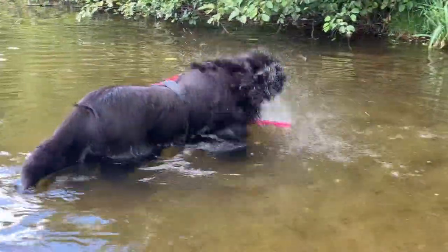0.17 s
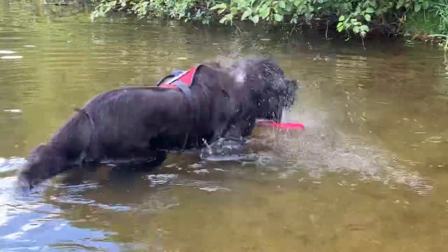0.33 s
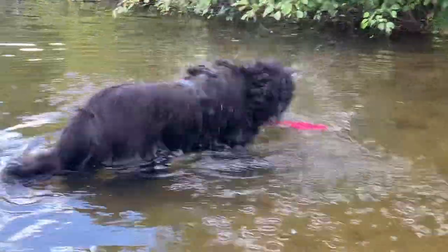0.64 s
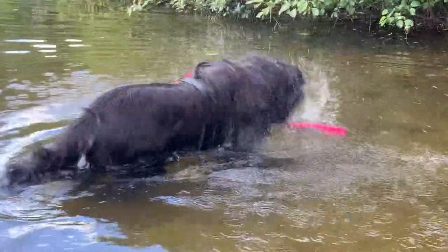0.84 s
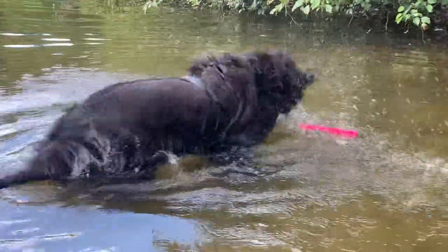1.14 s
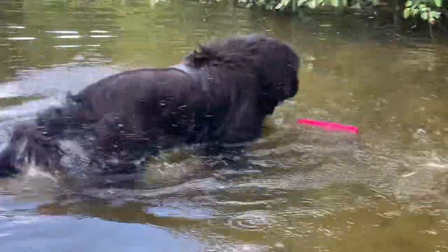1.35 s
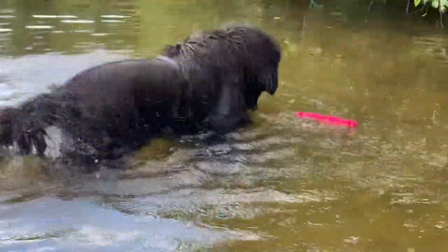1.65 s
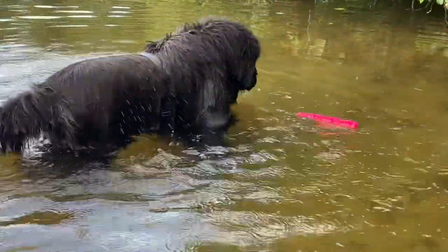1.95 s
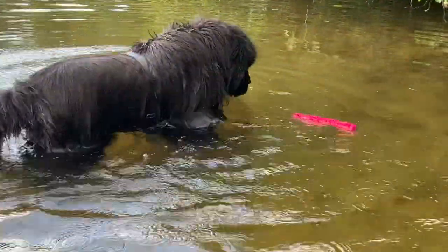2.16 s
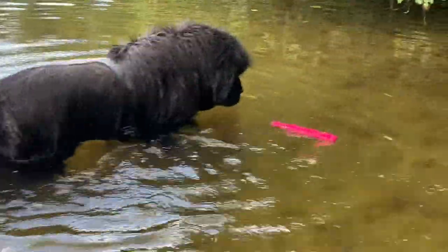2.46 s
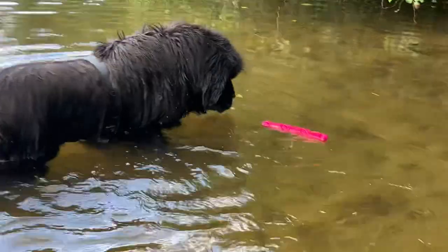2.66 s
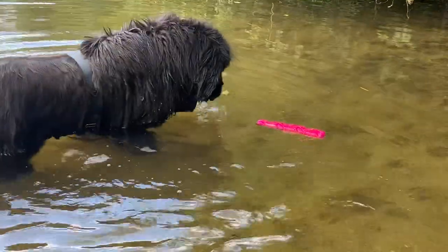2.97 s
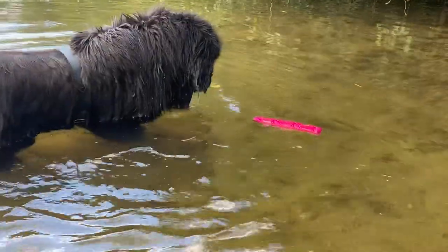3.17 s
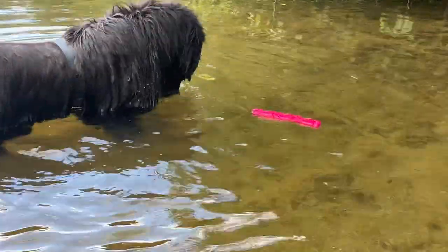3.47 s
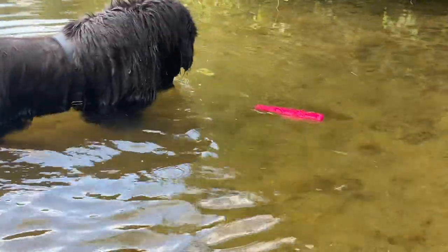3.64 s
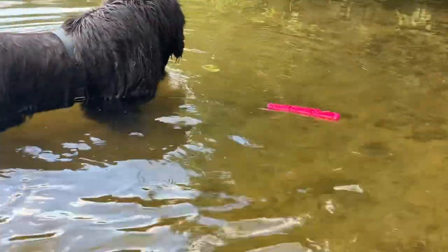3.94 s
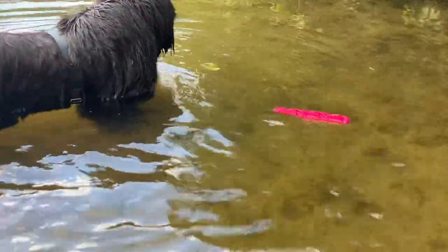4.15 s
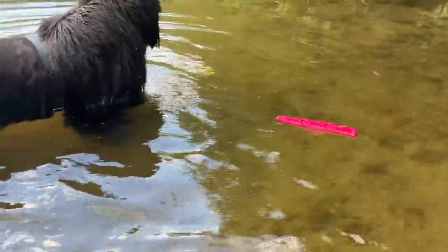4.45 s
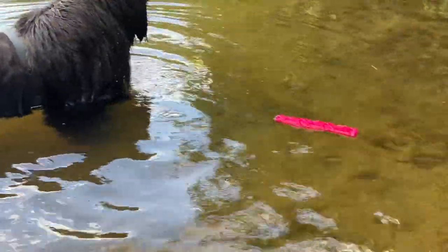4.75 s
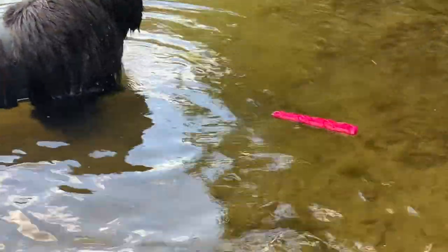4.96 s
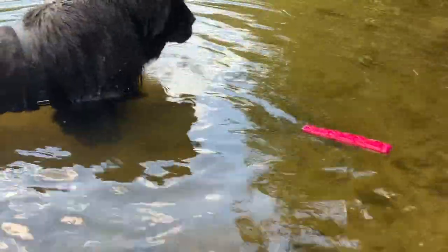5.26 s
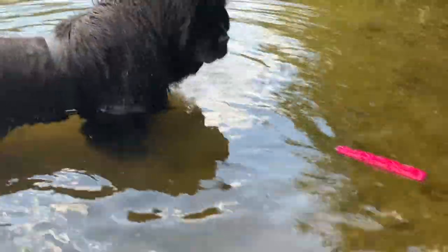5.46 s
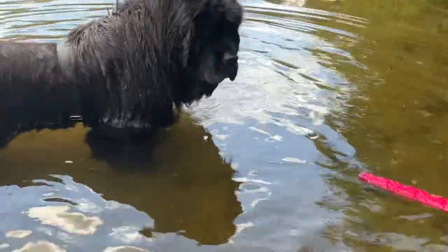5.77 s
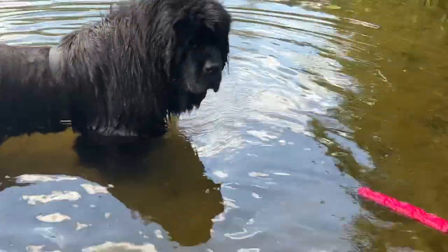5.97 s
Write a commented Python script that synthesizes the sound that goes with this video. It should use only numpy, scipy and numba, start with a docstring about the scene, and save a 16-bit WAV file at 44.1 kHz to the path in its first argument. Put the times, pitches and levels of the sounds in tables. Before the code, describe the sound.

A wet dog shakes itself in shallow water a few metres from a phone. From 0 to about 1.1 seconds its ears slap dully, roughly eight times a second, while sheets of spray burst out every quarter second and hiss onto the surface. Around 0.8 and 1.1 to 1.4 seconds water surges heavily with bubbly plops. From 1.5 to 2.6 seconds the splashing thins to trickles, bright drop ticks and small bubbles; two soft low bumps come at 2.8. From 3 to 4 it is almost quiet: isolated drips, faint shore hiss, light wind rumble, and tiny high insect chirps on the left at about 2.8, 3.3, 3.8 and 4.4. Small splashes return near 4.1, then from 4.7 to 6.1 wading grows strong again, with sloshes, glugs and clear plops, peaking near 4.9, 5.2 and 5.7. The stereo is wide and diffuse.

```python
"""Wet dog in a shallow lake

A big wet dog a few metres off shakes itself: ears slap, spray rains down. Then it wades.
Trapped air rings as swarms of dying sines, over filtered noise where bubbles fuse; drops tick as short bright rings.
Sliding tones make the glugs and climbing pulse trains an insect on the bank; shore hiss and light wind are noise.
A phone hears it through two ports that are out of step with each other."""
import sys
import numpy as np
from scipy import signal
from scipy.fft import rfft, irfft, next_fast_len
from scipy.io import wavfile
from scipy.ndimage import uniform_filter1d
from numba import njit

SR = 44100
rng = np.random.default_rng(int(sys.argv[2]) if len(sys.argv) > 2 else 0)


def to_wav(s):
    """Save 16-bit WAV."""
    ch = np.atleast_2d(s).T  # columns
    pcm = np.round(np.clip(ch, -1, 1) * 32767)  # PCM
    wavfile.write(sys.argv[1], SR, pcm.astype(np.int16))


N = 269451  # samples
SIZE = next_fast_len(N)  # transform length
OPPOSITE = np.array([[1], [-1]])  # signs that put a side signal on left and right


def undb(db):
    """Turn dB into an amplitude factor."""
    return 10 ** (np.asarray(db) / 20)


def unit(x):
    """Scale a sound to an rms of 1."""
    return x / np.sqrt(np.mean(x ** 2))


def over_hz(table):
    """Read a (Hz, value) table at every frequency bin, in straight lines over log frequency."""
    hz, value = np.transpose(table)
    bins_hz = np.arange(SIZE // 2 + 1) * SR / SIZE
    return np.interp(np.log(bins_hz + 1), np.log(hz), value)


def colour(x, table):
    """Filter a sound by a (Hz, dB) curve, then bring it to an rms of 1."""
    spectrum = rfft(x, SIZE) * undb(over_hz(table))
    return unit(irfft(spectrum, SIZE)[..., :N])


def hiss(wide):
    """White noise on both ports; wide sets the share that is opposite on the two."""
    mid, side = rng.standard_normal((2, N))
    return mid + wide * side * OPPOSITE


def walk(rate):
    """Random levels held for 1 / rate seconds and smoothed twice."""
    hold = int(SR / rate)
    steps = np.repeat(rng.standard_normal(N // hold + 1), hold)
    return uniform_filter1d(uniform_filter1d(steps, hold), hold)[:N]


@njit
def ring(count, sr, s, hz, t60, gain, side, rise, swell):
    """Dying sines: each swells in over swell cycles and climbs at rise octaves per t60."""
    out = np.zeros((2, count))
    for g in range(len(s)):
        start = int(s[g] * sr)
        long = int(t60[g] * sr * .75) + 2  # stop some 45 dB down
        fade = 1000. ** (-1 / (t60[g] * sr))
        glide = 2. ** (rise[g] / (t60[g] * sr))
        step, phase, level = 2 * np.pi * hz[g] / sr, 0., gain[g]
        for i in range(start, min(start + long, count)):
            v = level * np.sin(phase) * min(phase / (2 * np.pi * swell), 1.)
            out[0, i] += v * (1 + side[g])
            out[1, i] += v * (1 - side[g])
            phase += step
            step = min(step * glide, 2.8)  # stay below half the sample rate
            level *= fade
    return out


def hits(table, hz, t60, rise, side, swell=0.95):
    """Ring one dying sine for each (seconds, dB) row; side > 0 sits to the left."""
    s, db = np.transpose(table)
    same = np.ones(len(s))
    return ring(N, float(SR), s, hz * same, t60 * same, undb(db), side * same, rise * same, swell)


# Filter curves of the wading sounds. Each row: frequency in Hz, gain in dB.
SLOSH_COLOUR = [(150, -16), (260, -11), (380, -3.5), (560, -1), (900, -1.5), (1300, -0.5), (1900, -77)]
SPLASH_COLOUR = [(700, -11), (1300, 5.5), (1800, 8), (2500, 7.5), (3300, 4), (4100, 0), (4600, -14),
                 (5500, -8.5), (7500, -16.5)]
SPRAY_COLOUR = [(4000, -15), (7000, -7), (8500, 2.5), (10500, 6.5), (13000, 6), (15300, -12), (16500, -44)]
# The same for what the shake throws: a duller splash, and a spray that reaches lower.
SHAKE_SPLASH_COLOUR = [(700, -12), (1200, 8), (1800, 9.5), (2500, 3), (3800, -5), (4800, -12.5),
                       (7500, -21.5)]
SHAKE_SPRAY_COLOUR = [(2500, -60), (4500, 4), (7000, 5), (10500, 5), (13000, 2.5), (15000, 1), (16500, -56)]
SHAKE_END_S, SHAKE_FADE_S = 1.63, .5


def wading():
    """Three sizes of bubble swarm, each over a wash of bubbles too small and many to tell apart."""
    t = np.arange(N) / SR
    slosh_db, splash_db, spray_db = churn()
    slosh = swarm(count=2800, low_hz=202.1, high_hz=1828, cycles=20, scatter_db=2.4, rise=0.7,
                  wide=0.37, bunch_db=1.5)
    splash = swarm(count=14000, low_hz=806.5, high_hz=6780, cycles=26, scatter_db=2.8, rise=0.5,
                   wide=0.67, bunch_db=4.5)
    spray = swarm(count=32000, low_hz=2970, high_hz=15100, cycles=4.5, scatter_db=3.6, rise=0.073,
                  wide=0.75, bunch_db=6.5)
    # the harder the churning, the more the big and small bubbles fuse into a wash
    slosh = colour(slosh + undb(.3 * (slosh_db + 15)) * hiss(.2), SLOSH_COLOUR)
    splash = splash + undb(.35 * (splash_db + 21)) * hiss(.5)
    # sheets thrown by the shake land with a duller splash than wading makes
    shaking = np.clip((SHAKE_END_S - t) / SHAKE_FADE_S, 0, 1)
    thrown = colour(splash, SHAKE_SPLASH_COLOUR)
    splash = shaking * thrown + (1 - shaking) * colour(splash, SPLASH_COLOUR)
    # scattered clear droplets ride on the splash
    drips = swarm(count=900, low_hz=718, high_hz=4490, cycles=35, scatter_db=2.2, rise=0.61,
                  wide=0.51, bunch_db=1.5)
    splash = spread(splash + undb(-8) * colour(drips, SPLASH_COLOUR))
    # drops flung from the coat fall densely and in all sizes, so they hiss more evenly and reach lower
    flung = colour(spray + undb(-1) * hiss(.3), SHAKE_SPRAY_COLOUR)
    waded = colour(spray + undb(-5) * hiss(0.075), SPRAY_COLOUR)
    spray = shaking * flung + (1 - shaking) * waded
    return slosh * undb(slosh_db) + splash * undb(splash_db) + spray * undb(spray_db)


def swarm(count, low_hz, high_hz, cycles, scatter_db, rise, wide, bunch_db):
    """Bubbles of random moment, size and place, a few much louder, in bunches; about flat in energy per Hz."""
    when, size, luck, length, place = rng.random((count, 5)).T
    s = when * N / SR
    hz = low_hz * (high_hz / low_hz) ** size
    bunch = bunch_db * np.minimum(walk(70), 1.)[(s * SR).astype(int)]
    gain = hz * undb(bunch - scatter_db * np.log(luck + 0.0084))
    t60 = cycles * (0.23 + 2.94 * length) / hz
    return unit(ring(N, float(SR), s, hz, t60, gain, wide * (2 * place - 1), rise * length, 0.46))


# Restless water between surges. Each row: time in seconds, slosh of big bubbles in dB,
# splash of small bubbles in dB, spray in dB.
RESTLESS_WATER = [(0, -44, -42.5, -46.5), (.4, -47.5, -42, -46), (.72, -38, -38, -45),
                  (1.1, -35.5, -33.5, -44), (1.449, -39, -37.5, -47.5), (1.84, -38.5, -41.5, -51.5),
                  (2.12, -48, -54.5, -67), (2.5, -44, -52.5, -53.5), (2.66, -59, -47, -56.5),
                  (2.85, -63.5, -61, -67.5), (3.4, -77, -64, -67.5), (3.95, -65, -57, -63.5),
                  (4.16, -91, -59, -61.5), (4.62, -56, -46.5, -53.5), (4.86, -30.5, -29, -42),
                  (5.1, -38, -38, -46.5), (5.32, -46.5, -43, -50.5), (5.66, -34.5, -36.5, -48.5),
                  (5.84, -33.5, -31, -42.5), (5.98, -41.5, -46.5, -53), (6.11, -44, -47, -57)]
# A leg or the tail pushes a surge of water. Each row: crest in seconds, length in seconds,
# slosh in dB, splash in dB.
SURGES = [(0.275, 0.041, -38.5, -52), (0.79, 0.16, -33, -60), (1.13, 0.03, -36, -33),
          (1.166, 0.061, -33, -33), (1.246, 0.11, -29.5, -32), (1.346, 0.057, -38, -44),
          (2.03, 0.13, -57, -36.5), (2.205, 0.28, -42.5, -41.5), (2.417, 0.066, -40.5, -41),
          (2.53, 0.026, -65, -63), (2.63, 0.094, -71, -61), (2.976, 0.11, -59, -51.5),
          (3.173, 0.2, -52, -65), (3.7, 0.023, -85, -51.5), (4.093, 0.076, -44, -37),
          (4.235, 0.079, -64, -43.5), (4.369, 0.017, -57, -39.5), (4.488, 0.5, -39.5, -45.5),
          (4.683, 0.013, -34, -37.5), (4.738, 0.11, -55, -33), (5.156, 0.062, -29, -32),
          (5.285, 0.023, -28.5, -32), (5.403, 0.15, -45, -37), (5.533, 0.029, -32.5, -31.5),
          (5.674, 0.056, -38, -30.5), (5.937, 0.047, -32, -56), (6.038, 0.047, -37, -42)]
SURGE_SPRAY_DB = -14.5  # spray of a surge, against its splash
# Every second swing of the shake flings a sheet of drops. Each row: crest in seconds, spray in dB.
FLINGS = [(0.029, -39.5), (0.284, -33.5), (0.532, -33.5), (0.761, -34), (0.995, -31)]
FLING_S, FLING_SPLASH_DB = 0.032, 1  # length; splash where the sheet lands, against its spray


def churn():
    """Levels in dB of slosh, splash and spray: powers of restless water, surges and flung sheets add up."""
    coarse = np.arange(0, N, 32)
    s, *calm = np.transpose(RESTLESS_WATER)
    slosh, splash, spray = (undb(2 * np.interp(coarse / SR, s, db)) for db in calm)
    crest, long, slosh_db, splash_db = np.transpose(SURGES)
    fling, fling_db = np.transpose(FLINGS)
    slosh = slosh + swells(crest, long, slosh_db)
    splash = splash + swells(crest, long, splash_db) + swells(fling, FLING_S, fling_db + FLING_SPLASH_DB)
    spray = spray + swells(crest, long, splash_db + SURGE_SPRAY_DB) + swells(fling, FLING_S, fling_db)
    return [np.interp(np.arange(N), coarse, 10 * np.log10(power)) for power in (slosh, splash, spray)]


RISE_SHARE, FALL_SHARE = 0.46, 0.47  # of the length: from the crest to 1/e of its power, before and after


def swells(crest, long, db):
    """Summed power of bell-shaped swells, read every 32 samples."""
    late = np.arange(0, N, 32)[:, None] / SR - crest
    width = long * np.where(late < 0, RISE_SHARE, FALL_SHARE)
    return np.sum(undb(2 * db) * np.exp(-(late / width) ** 2), axis=1)


# How far the small bubbles spread around the dog. Each row: time in seconds, gain on left minus right in dB.
SPLASH_SPREAD = [(0, 3), (1.3, -4), (1.6, 1.5), (2.7, 2.5), (4.0, 2.5), (4.7, 3), (6.11, 4.5)]


def spread(x):
    """Widen or narrow a sound between the ports over time by scaling its side signal."""
    s, db = np.transpose(SPLASH_SPREAD)
    side = (x[0] - x[1]) / 2 * undb(np.interp(np.arange(N) / SR, s, db))
    return (x[0] + x[1]) / 2 + side * OPPOSITE


# Bubbles and plops that stand out. Each row: start in seconds, pitch at the start in Hz, level in dB,
# time to die by 60 dB in ms, pan as left over right in dB.
LONE_BUBBLES = [(0.122, 915, -18.5, 26, -4.5), (0.19, 757, -27.5, 110, -1), (0.216, 1240, -21, 22, -0.5),
                (0.215, 1970, -20, 26, -7), (0.307, 1570, -19, 9.5, -19), (0.551, 1270, -6.5, 10.5, -5.5),
                (0.551, 3900, -19, 8, 0), (0.657, 2830, -14.5, 10.6, -1), (0.715, 1760, -22.5, 21, 5),
                (0.802, 1550, -17.5, 9.4, -2), (0.812, 3470, -18.5, 9.6, -2), (0.822, 596, -21.5, 27, 16),
                (0.831, 2460, -29, 4.7, -10), (1.003, 1580, -15, 24, -10), (1.149, 1540, -6, 9.1, 5),
                (1.168, 2170, -18, 5.3, 0), (1.231, 2730, -26, 3.5, -4), (1.235, 836, -7, 37, 1),
                (1.282, 610, -9.5, 26, 0), (1.326, 2170, -17, 9.2, -8), (1.34, 1580, -15, 18, 3),
                (1.387, 375, -21, 53, 1), (1.593, 2670, -1.5, 3.2, 0), (1.597, 496, -27, 43, 2),
                (1.616, 1345, -23, 90, 2.5), (1.654, 1280, -24, 38, 9), (1.694, 1940, -24, 12, 7),
                (1.697, 430, -33.5, 51, 2), (1.721, 2290, -30, 10, 3), (1.741, 3020, -15, 4.8, 7.5),
                (1.812, 2790, -16, 9.2, 7.5), (1.837, 3560, -16, 6.1, -8), (1.87, 2930, -24, 8, -2),
                (1.96, 540, -28.5, 156, 1.5), (1.987, 3070, -19, 3.8, 15), (1.996, 2300, -14, 13, -1.5),
                (2.013, 806, -23, 83, -1), (2.032, 2710, -9.5, 3.6, 23), (2.041, 2600, -23, 6, 10),
                (2.075, 2560, -17, 9.8, 4), (2.092, 2260, -18.5, 6.4, 12), (2.188, 384, -26.5, 49, 1.5),
                (2.222, 2790, -34, 9, 3), (2.287, 2250, -29, 9.7, 4), (2.346, 2210, -17.5, 5.9, 4.5),
                (2.368, 360, -27.5, 66, 1), (2.407, 1670, -20.5, 31, -18), (2.421, 2030, -22, 14, 17),
                (2.517, 1880, -24, 13, -2), (2.518, 3590, -22, 4.4, -2), (2.6, 3350, -40, 8, -1),
                (2.619, 1720, -39, 12, 0), (2.575, 1870, -31.5, 19, -2), (2.696, 2430, -32.5, 29, 18),
                (2.956, 3770, -31.5, 3.7, 14), (2.978, 2550, -39, 8.1, 0), (3.085, 513, -33.5, 56, 1),
                (3.124, 553, -33.5, 47, 2), (3.163, 1970, -46, 11, -3), (3.543, 2490, -45, 29, -23),
                (3.703, 2310, -31.5, 12, 30), (3.806, 1450, -41.5, 17, 13), (3.822, 2640, -36, 6.1, 20),
                (3.896, 2270, -33, 6.9, 22), (3.897, 4780, -23.5, 4.5, 1.5), (3.965, 1055, -39, 110, 1.5),
                (3.996, 2010, -36.5, 12, 5), (4.02, 2680, -34, 31, 8), (4.067, 1920, -22.5, 9.4, 22),
                (4.083, 550, -28.5, 58, 2), (4.176, 2220, -29, 15, 17), (4.217, 1070, -28.5, 100, 2.5),
                (4.237, 2100, -28, 12, 10), (4.253, 2120, -29, 13, -5), (4.272, 523, -9.5, 6.3, 0),
                (4.36, 2220, -31, 8.3, 12), (4.367, 790, -25, 64, 3), (4.369, 385, -34, 260, 0.5),
                (4.443, 477, -21, 58, -1), (4.442, 1890, -22.5, 18, 4), (4.578, 1030, -24, 59, 4),
                (4.536, 3220, -22.5, 5.7, 3.5), (4.594, 1670, -23, 12, 3), (4.681, 1170, -15.5, 17, -3),
                (4.679, 3040, -9, 5.2, -3), (4.679, 2700, -7, 5.1, -1.5), (4.686, 2420, -27, 13, -3),
                (4.747, 1150, -17.5, 46, 2.5), (4.71, 2780, -17, 6.9, 4), (4.832, 5500, -29, 6, 0),
                (4.802, 2150, -20, 14, 1), (4.844, 3100, -23, 6.7, 7), (4.862, 960, -21, 17, 0),
                (4.881, 1040, -16, 14, 12), (5.001, 1360, -16.5, 13, -21), (5.024, 1900, -19, 8, 12),
                (5.117, 700, -10.5, 52, 2), (5.132, 2320, -11.5, 10, 8), (5.162, 2240, -19, 22, 5),
                (5.16, 1050, -16, 19, -0.5), (5.182, 800, -21, 22, 4.5), (5.204, 2790, -25, 11, 8),
                (5.284, 2190, -22.5, 26, 21), (5.352, 2480, -20.5, 24, 32), (5.357, 4480, -6.5, 3, 5.5),
                (5.361, 533, -32.5, 200, 2), (5.389, 3400, -23, 19, 18), (5.411, 2080, -22, 56, -28),
                (5.426, 3160, -5.5, 3.5, 25), (5.536, 920, -11, 17, -1), (5.562, 1830, -20.5, 34, 10),
                (5.601, 1100, -24.5, 66, 11), (5.636, 858, -18, 56, 4.5), (5.657, 5600, -26, 6, 4),
                (5.705, 3200, -22, 8.1, 8), (5.87, 1670, -15.5, 27, 18), (5.888, 1300, -13, 16, 2),
                (5.902, 1990, -24.5, 55, 6), (5.974, 1800, -16.5, 15, 3), (6.037, 1030, -22, 24, 1),
                (6.068, 2220, -27.5, 36, -28)]
# Single drops that tick on the surface. Each row: start in seconds, level in dB.
DROP_TICKS = [(0.287, -15.5), (0.518, -16), (0.62, -32), (1.0, -13), (1.084, -18.5), (1.728, -28),
              (1.759, -27), (1.841, -26), (1.867, -32), (1.916, -29), (1.966, -24.5), (2.122, -33),
              (2.187, -32), (2.223, -36), (2.321, -29), (2.354, -29), (2.41, -52), (2.424, -30),
              (2.501, -37), (2.521, -29.5), (2.543, -26), (2.577, -34), (2.696, -34.5), (3.13, -43),
              (3.274, -31), (3.547, -37), (3.685, -33), (3.828, -39), (3.897, -31), (4.058, -25.5),
              (4.086, -24), (4.576, -35), (4.596, -40), (4.611, -22), (5.061, -31), (5.132, -21),
              (5.185, -27), (5.291, -26), (5.634, -20.5), (5.657, -40), (5.677, -22), (5.753, -14.5)]


def plops():
    """Lone bubbles ring and climb in pitch; drops tick at three bright pitches at once."""
    s, hz, db, ms, pan_db = np.transpose(LONE_BUBBLES)
    side = (undb(pan_db) - 1) / (undb(pan_db) + 1)
    bubbles = hits(np.transpose([s, db]), hz, ms / 1000, rise=0.587, side=side, swell=1.1)
    middle, high, low = rng.random((len(DROP_TICKS), 3)).T
    ticks = hits(DROP_TICKS, 9000 + 2500 * middle, 0.0025, rise=0., side=0.)
    ticks += undb(-8) * hits(DROP_TICKS, 13000 + 2000 * high, 0.0035, rise=0., side=0.)
    ticks += undb(-5) * hits(DROP_TICKS, 5500 + 3000 * low, 0.003, rise=0., side=0.)
    return bubbles + ticks


# Ears slap the head at each swing. Each row: start in seconds, level in dB.
EAR_SLAPS = [(.188, -23.5), (.307, -16), (.431, -21.5), (.555, -21), (.668, -26), (.792, -42),
             (.905, -20.5), (1.019, -17), (1.135, -28)]
# Two soft low bumps. Each row: start in seconds, level in dB.
LOW_BUMPS = [(2.792, -31), (2.814, -34.5)]


def body():
    """Wet ears slap dully, with a brighter edge and a low thud; bumps are low, quickly dying sines."""
    ears = hits(EAR_SLAPS, 327, 0.021, rise=-0.073, side=0.)
    ears += undb(2) * hits(EAR_SLAPS, 600, 0.016, rise=0., side=0.)
    ears += undb(-10) * hits(EAR_SLAPS, 157, 0.044, rise=0., side=0.)
    return ears - hits(LOW_BUMPS, 76, 0.067, rise=0., side=0.)


# Air pockets that fill or empty slowly. Each row: start in seconds, end in seconds, first pitch in Hz,
# last pitch in Hz, level in dB before the flutter.
AIR_POCKETS = [(1.168, 1.208, 432, 351, -33), (1.222, 1.271, 512, 806, -26),
               (1.495, 1.539, 200, 175, -39.5), (1.55, 1.596, 173, 160, -44.5),
               (1.62, 1.687, 172, 210, -46.5), (1.685, 1.74, 195, 217, -48), (2.23, 2.272, 313, 333, -42),
               (2.292, 2.332, 389, 444, -35), (3.036, 3.076, 478, 580, -48), (3.626, 3.69, 450, 774, -58.5),
               (4.186, 4.228, 382, 285, -43.5), (4.255, 4.29, 349, 810, -28.5),
               (4.318, 4.34, 413, 480, -38), (4.722, 4.752, 322, 588, -29.5),
               (4.851, 4.887, 422, 338, -38.5), (4.941, 4.957, 380, 415, -30.5),
               (5.043, 5.099, 310, 485, -31), (5.519, 5.582, 298, 375, -36.5),
               (5.634, 5.642, 463, 380, -26), (5.669, 5.714, 284, 342, -34.5),
               (5.762, 5.78, 278, 333, -33.5), (5.825, 5.849, 392, 483, -26)]


def glugs():
    """A pocket of air changes size, so its tone slides; its level flutters."""
    out = np.zeros(N)
    for start, end, first_hz, last_hz, db in AIR_POCKETS:
        k = int((end - start) * SR)
        hz = np.geomspace(first_hz, last_hz, k)
        tone = np.sin(2 * np.pi * np.cumsum(hz) / SR)
        out[int(start * SR):][:k] += undb(db) * np.sqrt(np.hanning(k)) * tone
    return out * undb(4 * walk(110))


# Insect chirps. Each row: start in seconds, level of the strong strokes in dB before random variation and flutter.
INSECT_CHIRPS = [(2.752, -60), (3.287, -55.5), (3.838, -56.5), (4.385, -57)]
CHIRP_HZ, CHIRP_CLIMB_HZ, WAVER_HZ = 4970, 25, 50  # first stroke, climb per stroke, random variation
STROKE_GAP_S, STROKE_RING_S = .023, .1  # ring: time to die by 60 dB


def insect():
    """Six strokes a chirp, strong and weak in turn, climb and waver, each at a slightly different place on the left."""
    stroke = np.arange(6)
    loud, waver, place = rng.standard_normal((len(INSECT_CHIRPS), 6, 3)).transpose(2, 0, 1)
    s, db = (column[:, None] for column in np.transpose(INSECT_CHIRPS))
    stroke_s = s + STROKE_GAP_S * stroke
    stroke_db = db - 5 * (stroke % 2) + loud
    hz = CHIRP_HZ + CHIRP_CLIMB_HZ * stroke + WAVER_HZ * waver
    rows = np.transpose([stroke_s.ravel(), stroke_db.ravel()])
    side = .6 + .15 * place.ravel()
    return hits(rows, hz.ravel(), STROKE_RING_S, rise=0., side=side, swell=20.) * undb(5 * walk(300))


# Wind on the ports. Each row: time in seconds, level in dB before random gusting.
WIND_LEVEL = [(0, -52), (.12, -61), (.4, -52), (1.2, -51), (1.7, -54.5), (2.0, -53), (2.6, -53.5),
              (3.3, -54), (3.35, -67), (3.65, -60), (4.1, -60.5), (4.5, -57), (4.9, -59), (5.4, -54),
              (5.8, -53.5), (6.11, -60)]
# Filter curves of wind rumble and of shore hiss. Each row: frequency in Hz, gain in dB.
RUMBLE_COLOUR = [(30, -55), (37, -17), (48, -9), (90, -3.5), (160, -6.5), (300, -15), (600, -57)]
AIR_COLOUR = [(150, 5), (260, 13), (400, -2), (900, 13), (1800, -2), (2500, 4.5), (4200, -1.5), (5600, -2),
              (7000, 0), (11000, -22), (16000, -8)]
AIR_DB = -66.5  # shore hiss, about which it drifts


def air():
    """The faint hiss of shore and leaves, and gusting wind rumble that differs at each port."""
    s, db = np.transpose(WIND_LEVEL)
    rumble = colour(hiss(1.8), RUMBLE_COLOUR)
    wind = undb(np.interp(np.arange(N) / SR, s, db) + 2.6 * walk(13)) * rumble
    return wind + undb(AIR_DB + 0.45 * walk(9.9)) * colour(hiss(0.8), AIR_COLOUR)


# Filter curve of echoes that reach the ports from the sides. Each row: frequency in Hz, gain in dB.
SIDE_ECHO_COLOUR = [(900, -22), (1700, -4.5), (3000, -10), (4500, -1), (7000, -73), (16000, -34)]


def scatter(x, t60, wet_db, side_db):
    """Ripples, coat and bank throw back a short smear of dying noise; part of it comes from the sides."""
    front, side = rng.standard_normal((2, N))
    t = np.arange(int(t60 * SR)) / SR
    fade = 1000. ** (-t / t60) * (t > .001)
    fade = fade / np.sqrt(np.sum(fade ** 2))
    tail = undb(wet_db) * front + undb(side_db) * colour(side, SIDE_ECHO_COLOUR) * OPPOSITE
    return x + signal.fftconvolve(x, tail[:, :len(t)] * fade, axes=1)[:, :N]


def scene():
    """Everything wet is smeared by echoes; insect and air stay clear."""
    water = wading() + plops() + body() + glugs()
    return scatter(water, t60=0.09, wet_db=-15, side_db=-17) + insect() + air()


# Lead of the left port. Each row: frequency in Hz, phase in radians.
LEFT_LEAD = [(40, 0), (260, .2), (600, 2.45), (950, 3.15), (4300, 3.15), (5700, 3.5), (6900, 4.5),
             (7700, 6.1), (9500, 6.6), (11100, 9.3), (12900, 9.9), (13900, 12.4), (16600, 12.7)]
# Balance of the ports. Each row: frequency in Hz, left over right in dB.
PORT_BALANCE = [(60, 2), (200, 2.5), (380, 4.8), (650, 0), (1000, 0), (2400, 1.8), (4400, 1.5), (8000, 0)]
# How far apart the ports tell places. Each row: frequency in Hz, gain on left minus right in dB.
PORT_WIDTH = [(40, 7.5), (130, -23), (400, 5.5), (950, -4), (1500, -4.5), (2200, -2), (3500, -3),
              (5500, -2.5), (12000, -5)]
TOP_HZ = 16500  # upper cutoff


def record(dry):
    """The right port lags the left by a phase that grows with pitch; the top is cut."""
    left, right = rfft(dry, SIZE)
    mid = (left + right) / 2
    side = (left - right) / 2 * undb(over_hz(PORT_WIDTH))
    tilt = undb(over_hz(PORT_BALANCE) / 2)
    lag = np.exp(-1j * over_hz(LEFT_LEAD))
    ports = [(mid + side) * tilt, (mid - side) * lag / tilt]
    heard = irfft(ports, SIZE)[:, :N]
    return signal.sosfilt(signal.ellip(10, .2, 75, TOP_HZ, fs=SR, output="sos"), heard)


dry = scene()
out = record(dry)
to_wav(out)
```